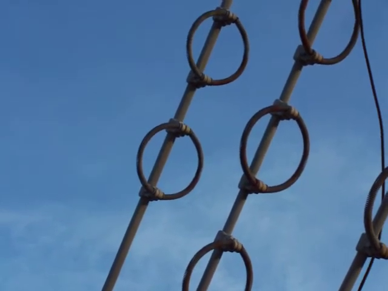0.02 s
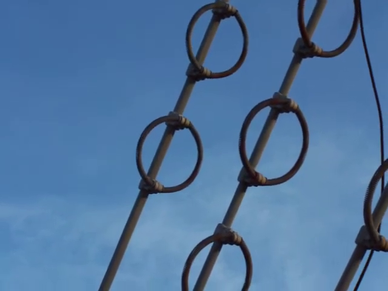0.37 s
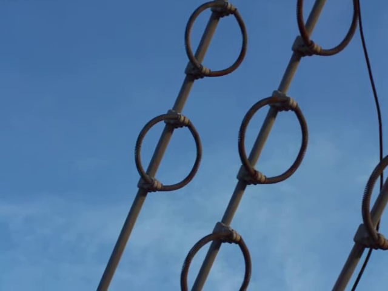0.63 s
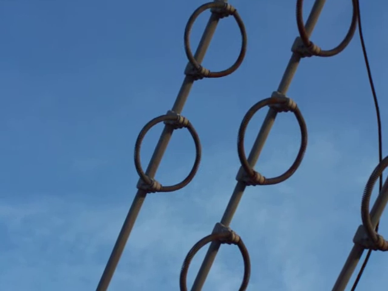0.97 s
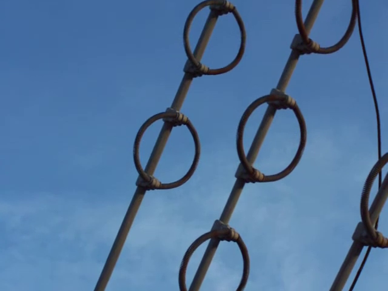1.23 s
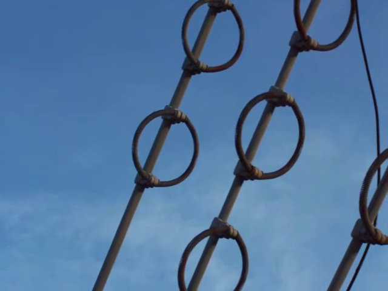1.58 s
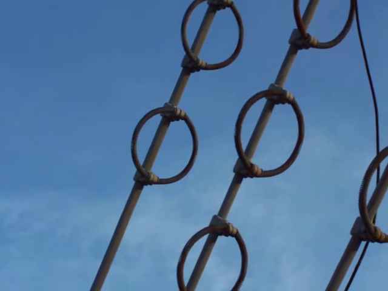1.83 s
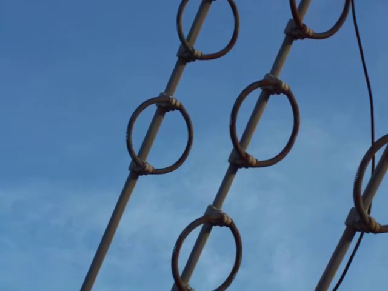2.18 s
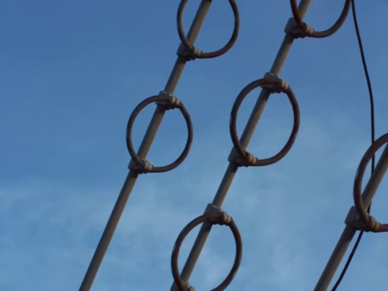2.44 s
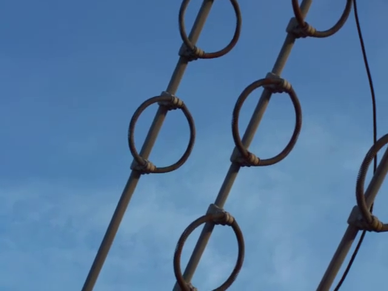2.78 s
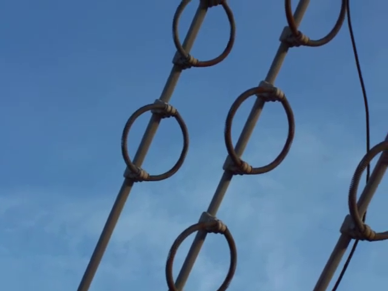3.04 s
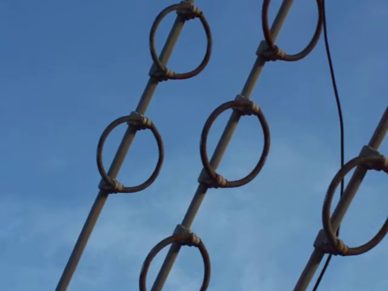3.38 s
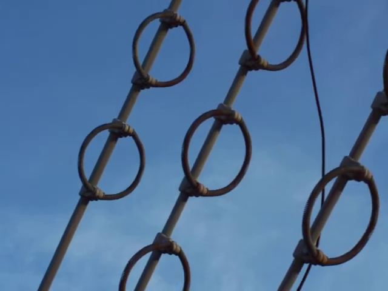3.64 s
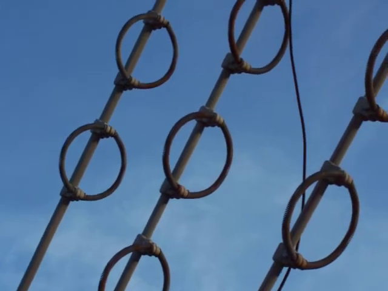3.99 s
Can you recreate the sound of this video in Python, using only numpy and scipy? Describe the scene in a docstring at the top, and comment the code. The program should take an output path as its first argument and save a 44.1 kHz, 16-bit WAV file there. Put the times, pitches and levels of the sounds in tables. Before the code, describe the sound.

Loose steel fittings rattle rapidly on shaking guy wires, over steady rushing wind.

```python
"""Outdoors by a set of guy wires, one microphone; rushing wind and faintly singing wires lie behind.
From the start the wires shake about seventeen times a second and loose steel fittings clack on each
swing: short runs of rebounds that set the steel ringing, with light chatter between. Near 1.5 s the
clacks weaken and a gust buffets the microphone. From 2.3 s, in stronger wind, the fittings squeak,
then clack hard again to the end, while one wire whistles and more gusts thump the microphone."""
import sys
import numpy as np
from scipy import signal
from scipy.fft import irfft
from scipy.io import wavfile

SR = 44100
rng = np.random.default_rng(int(sys.argv[2]) if len(sys.argv) > 2 else 0)


def waveform_to_disk(signal):
    """Save audio, clipped to [-1, 1], as 16-bit WAV at the path in sys.argv[1]."""
    frames = np.transpose(np.atleast_2d(signal))
    scaled = np.clip(frames, -1, 1) * 32767
    samples = np.round(scaled).astype(np.int16)
    wavfile.write(sys.argv[1], SR, samples)


N = 176400
TIME = np.arange(N) / SR

# rushing air in the background, spectrum: f/Hz, relative level/dB
WIND_SPECTRUM = [(30, -2), (120, -4.5), (260, -4.5), (850, -6.5), (1400, -4.5), (2050, -5), (2900, -3),
                 (3550, -1.5), (4100, -8), (6000, -23), (7500, -21), (9000, -34)]
# its loudness: t/s, level/dB
WIND_LEVELS = [(0, -28.5), (1.3, -28.5), (1.8, -29.5), (4, -29.5)]
# wires singing behind the rattle: f/Hz, width/Hz, level/dB
WIRE_TONES = [(133.6, 8.7, -52), (273, 9, -49), (395, 11, -44.5), (464.4, 7, -50), (1308, 75, -47.5)]
# one wire whistling in the stronger wind: t/s, level/dB
WHISTLE_LEVELS = [(2.5, -62), (2.8, -41.5), (3.2, -55.5), (3.65, -40), (4, -50)]
# eddies right at the microphone: t/s, level/dB
EDDY_LEVELS = [(0, -52), (1.55, -60.5), (1.64, -28.5), (1.89, -34), (2.0, -49), (2.25, -46), (2.36, -32),
               (2.93, -38.5), (3.05, -38), (3.4, -30.5), (3.58, -38.5), (4, -29)]
# their spectrum: f/Hz, relative level/dB
EDDY_SPECTRUM = [(15, -8.5), (35, -2.5), (85, -3), (140, -10.5), (250, -22.5), (600, -38)]
# gusts hitting the microphone: t/s, level/dB, half length/s, centre f/Hz
GUST_THUMPS = [(1.627, -22.5, 0.009, 125), (2.551, -19.5, 0.007, 125), (2.663, -24.5, 0.008, 135),
               (2.709, -19, 0.008, 88), (2.903, -19.5, 0.018, 95), (2.946, -17, 0.0095, 98),
               (3.274, -22.5, 0.007, 135), (3.97, -25.5, 0.015, 155)]
# light rubbing of the fittings: t/s, level/dB
CHAFE_LEVELS = [(0, -37.5), (1.0, -56.5), (1.7, -46.5), (2.3, -52), (2.7, -44), (4, -38)]
# a fitting squeaks on the back swing: t/s, level/dB
BACKSWING_SQUEAKS = [(2.304, -29.0), (2.364, -30), (2.421, -30), (2.48, -28.5), (2.661, -29.0),
                     (2.721, -25), (3.065, -28), (3.306, -26), (3.366, -26), (3.427, -26), (3.486, -31.5),
                     (3.542, -24), (3.6, -28), (3.66, -28.5), (3.827, -40), (3.946, -29.0)]
# loose chatter of the fittings: t/s, level/dB
CHATTER_LEVELS = [(0, -38), (.3, -37), (.45, -28.5), (.7, -35.5), (1.05, -30.5), (1.3, -47), (1.65, -59),
                  (2.0, -36.5), (2.25, -52), (2.75, -31), (3.1, -42), (3.25, -29.5), (3.5, -40), (4, -32)]
# the steel's crowd of short modes: f/Hz, relative level/dB
STEEL_SPECTRUM = [(500, -49), (1200, -15.5), (2100, -8.5), (2700, -2), (3450, 1.5), (4280, 4.5), (4430, -1),
                  (4600, 3), (5100, 0.5), (5700, -0.5), (6550, -8), (7000, 1.5), (7400, -8), (9000, -21)]
# single steel modes that ring on: f/Hz, level/dB, t60/s
LONG_MODES = [(2585, -38, .15), (3575, -41, .08), (4562, -39, .12), (5720, -38, .09), (6865, -41, .05)]
# a fitting hits the wire, in the foreground: t/s, relative level/dB, run of rebounds/s
FITTING_HITS = [(0.0254, -2.5, 0.012), (0.0862, -2.5, 0.012), (0.1438, -3.5, 0.014), (0.2036, -4.5, 0.011),
                (0.2254, -12, 0.015), (0.264, -3, 0.013), (0.319, -4.5, 0.01), (0.3345, -9, 0.01),
                (0.3744, -5.5, 0.011), (0.4023, -5.5, 0.005), (0.4292, -18, 0.01), (0.444, -16, 0.009),
                (0.469, -6.5, 0.005), (0.5399, -7.5, 0.015), (0.56, -11.5, 0.015), (0.6001, -3.5, 0.008),
                (0.6601, -3, 0.011), (0.7187, -3, 0.015), (0.7775, -3.5, 0.014), (0.8363, -5.5, 0.012),
                (0.9177, -7, 0.005), (0.928, -18, 0.015), (0.9789, -13, 0.018), (1.02, -15.5, 0.018),
                (1.0516, -10.5, 0.006), (1.074, -16, 0.014), (1.12, -8, 0.014), (1.1758, -9, 0.017),
                (1.2344, -5.5, 0.015), (1.2933, -3, 0.012), (1.3527, -5, 0.013), (1.4109, -5, 0.014),
                (1.4697, -8.5, 0.012), (1.522, -13.0, 0.015), (1.576, -13.5, 0.018), (1.7475, -15.5, 0.009),
                (1.8071, -13, 0.008), (1.8664, -8, 0.011), (1.8945, -21, 0.018), (1.9273, -8.5, 0.014),
                (1.9887, -7.5, 0.01), (2.049, -13, 0.012), (2.109, -10.5, 0.01), (2.168, -10.5, 0.006),
                (2.224, -16, 0.011), (2.2936, -22, 0.018), (2.3924, -19, 0.01), (2.449, -12.5, 0.012),
                (2.509, -6.0, 0.008), (2.5701, -3, 0.007), (2.632, -2.5, 0.014), (2.691, -3.5, 0.012),
                (2.7428, -10.5, 0.007), (2.7508, -3.5, 0.01), (2.809, -3, 0.01), (2.8696, -3.5, 0.012),
                (2.927, -4.5, 0.008), (2.9831, -5.5, 0.009), (3.0379, -5.5, 0.014), (3.0961, -7, 0.015),
                (3.153, -12.5, 0.013), (3.181, -6.5, 0.007), (3.2134, -6.5, 0.01), (3.2479, -4.5, 0.006),
                (3.2729, -3.5, 0.007), (3.3163, -6, 0.006), (3.3311, -3.5, 0.013), (3.3908, -3, 0.012),
                (3.4501, -3.0, 0.012), (3.509, -5.5, 0.013), (3.5692, -2.5, 0.012), (3.628, -3, 0.009),
                (3.6866, -4, 0.009), (3.743, -3.5, 0.011), (3.801, -5.5, 0.015), (3.8557, -5.5, 0.018),
                (3.9126, -4.5, 0.013), (3.9707, -4.5, 0.009)]

HUM_HZ, HUM_WAVER_HZ, HUM_DB = 66.5, 0.29, -40.5
SQUEAK_HZ, SQUEAK_SCATTER_HZ, SQUEAK_WIDTH_HZ = 5340, 80, 460
CHATTER_PER_S, CHATTER_SPREAD_DB = 450, 5
FLUTTER_HZ, CHAFE_FLUTTER_DB, CHATTER_CLUMP_DB = 29, 2, 2.5
SCUFF_DB, SCUFF_RISE_S, SCUFF_FALL_SHARE = -14.5, .0008, 0.5   # fall time as a share of the run
CLACK_DB, REBOUND_LOSS_DB, REBOUND_SPREAD_DB = 8.5, 15, 2.5   # loss over the whole run
CRACK_DB, CRACK_BAND_HZ = 8.5, (2580, 8000)
TICK_DB, TICK_T60_S, STEEL_T60_S, TAIL_DB, TAIL_T60_S = -1.5, 0.0058, 0.043, -10.5, 0.16


def from_db(db):
    return 10 ** (np.asarray(db) / 20)


def rms_one(x):
    return x / np.sqrt(np.mean(x ** 2) + 1e-20)


def level(rows):
    """Gain over time from rows of t/s, level/dB."""
    return from_db(np.interp(TIME, *np.transpose(rows)))


def swell(s, half_s):
    """A bell-shaped rise and fall of height 1."""
    return np.exp(-.5 * ((TIME - s) / half_s) ** 2)


def noise(gain_at):
    """Noise of rms 1 whose spectrum follows a function of frequency."""
    hz = np.maximum(np.fft.rfftfreq(N, 1 / SR), 1)
    phases = np.exp(2j * np.pi * rng.random(len(hz)))
    return rms_one(irfft(gain_at(hz) * phases, N))


def coloured(rows):
    """Noise of rms 1 shaped by rows of f/Hz, level/dB."""
    f, db = np.transpose(rows)
    return noise(lambda hz: from_db(np.interp(np.log(hz), np.log(f), db)))


def drift(rate_hz):
    """A slow random wander of rms 1."""
    return noise(lambda hz: 1 / (1 + (hz / rate_hz) ** 2))


def tone(centre_hz, width_hz):
    """A narrow, wavering band of noise; rms 1."""
    return noise(lambda hz: 1 / (1 + ((hz - centre_hz) / width_hz) ** 2))


def wind():
    """Air rushes almost steadily behind everything."""
    return level(WIND_LEVELS) * coloured(WIND_SPECTRUM)


def singing_wires():
    """Wind over the wires: a low hum, faint narrow tones and a late whistle."""
    phase = 2 * np.pi * np.cumsum(HUM_HZ + HUM_WAVER_HZ * drift(rate_hz=0.89)) / SR
    hum = from_db(HUM_DB) * rms_one(np.sin(phase))
    whistle = level(WHISTLE_LEVELS) * tone(centre_hz=916, width_hz=14)
    return hum + whistle + sum(from_db(db) * tone(hz, width) for hz, width, db in WIRE_TONES)


def microphone_wind(width_octaves=0.84):
    """Eddies rumble on the microphone and gusts hit it with short, low thumps."""
    out = level(EDDY_LEVELS) * coloured(EDDY_SPECTRUM)
    for s, db, half_s, centre in GUST_THUMPS:
        shape = swell(s, half_s)
        air = noise(lambda hz: np.exp(-.5 * (np.log2(hz / centre) / width_octaves) ** 2) / np.sqrt(hz))
        puff = shape * air
        out += from_db(db) * puff * np.linalg.norm(shape) / np.linalg.norm(puff)
    return out


def squeaks():
    """Fittings chafe thinly and break into short squeaks, each at a slightly different pitch."""
    flutter = from_db(CHAFE_FLUTTER_DB * drift(FLUTTER_HZ))
    out = level(CHAFE_LEVELS) * flutter * tone(SQUEAK_HZ, SQUEAK_WIDTH_HZ)
    for s, db in BACKSWING_SQUEAKS:
        hz = SQUEAK_HZ + SQUEAK_SCATTER_HZ * rng.standard_normal()
        out += from_db(db) * swell(s, half_s=0.0047) * tone(hz, SQUEAK_WIDTH_HZ)
    return out


def chatter():
    """Force of the loose fittings touching lightly, in small clumps."""
    sizes = from_db(CHATTER_SPREAD_DB * np.minimum(rng.exponential(1, N), 4))
    sizes *= rng.choice([-1, 1], N)
    clumps = from_db(CHATTER_CLUMP_DB * drift(FLUTTER_HZ))
    touches = rng.random(N) < CHATTER_PER_S / SR
    return level(CHATTER_LEVELS) * rms_one(clumps * sizes * touches)


def scuffs():
    """Force of a fitting grinding along the wire as it lands, fading with its rebounds."""
    offsets = np.arange(-SR // 20, SR // 10)
    t = offsets / SR
    pressure = np.zeros(N)
    for s, db, run_s in FITTING_HITS:
        shape = np.exp(np.minimum(t / SCUFF_RISE_S, -t / (SCUFF_FALL_SHARE * run_s)))
        pressure[np.clip(int(s * SR) + offsets, 0, N - 1)] += from_db(db + SCUFF_DB) * shape
    return pressure * rng.standard_normal(N)


def cracks():
    """The bare click of steel on steel: the hardest contact, early in each run of rebounds."""
    clicks = np.zeros(N)
    for s, db, run_s in FITTING_HITS:
        at_s = s + run_s * rng.uniform(0, .3)
        clicks[int(at_s * SR)] += from_db(db + CRACK_DB) * rng.choice([-1, 1])
    band = signal.butter(2, CRACK_BAND_HZ, "band", fs=SR, output="sos")
    return signal.sosfilt(band, clicks + 1e-18)


def clacks(touches=8, points=4):
    """Force at each contact point: every clack is a hit and a run of weakening, uneven rebounds."""
    force, touch = np.zeros((points, N)), np.arange(touches)
    for s, db, run_s in FITTING_HITS:
        jitter = rng.uniform(-.45, .45, touches) * (touch > 0)
        along = (touch + jitter) / (touches - 1)
        size = from_db(-REBOUND_LOSS_DB * along + REBOUND_SPREAD_DB * rng.standard_normal(touches))
        size *= from_db(db + CLACK_DB) / np.linalg.norm(size) * rng.choice([-1, 1], touches)
        at = np.clip(((s + along * run_s) * SR).astype(int), 0, N - 1)
        force[(touch + rng.integers(points)) % points, at] += size
    return force


def ring(force, hz, t60):
    """One steel mode: a unit click starts a dying sine of height 1."""
    r, w = from_db(-60 / (t60 * SR)), 2 * np.pi * hz / SR
    return signal.lfilter([0, np.sin(w)], [1, -2 * r * np.cos(w), r * r], force + 1e-18)


def steel_decay(t60):
    """A crowd of steel modes dying together; energy 1."""
    decay = (coloured(STEEL_SPECTRUM) * from_db(-60 * TIME / t60))[:SR // 2]
    return decay / np.linalg.norm(decay)


def fittings():
    """Each contact point answers with a tick, a short ring and a faint tail; all share the long modes."""
    points = clacks()
    forces = [hits + (chatter() + scuffs()) / np.sqrt(len(points)) for hits in points]
    out = np.zeros(N)
    for force in forces:
        tick = from_db(TICK_DB) * steel_decay(TICK_T60_S)
        body = steel_decay(STEEL_T60_S)
        tail = from_db(TAIL_DB) * steel_decay(TAIL_T60_S)
        out += signal.fftconvolve(force, tick + body + tail)[:N]
    total_force = sum(forces)
    return out + sum(from_db(db) * ring(total_force, hz, t60) for hz, db, t60 in LONG_MODES)


def scene():
    """One microphone: the rattle in front, wires and wind behind, gusts on the capsule."""
    rattle = cracks() + fittings() + squeaks()
    return (rattle + singing_wires() + wind() + microphone_wind())[None]


def record(dry, treble_edge_hz=6775, cutoff_hz=8965):
    """The treble rolls off, then the top is cut steeply."""
    roll_off = signal.butter(8, treble_edge_hz, fs=SR, output="sos")
    top_cut = signal.ellip(10, .2, 75, cutoff_hz, fs=SR, output="sos")
    return signal.sosfilt(top_cut, signal.sosfilt(roll_off, dry))


dry = scene()
out = record(dry)
waveform_to_disk(out)
```